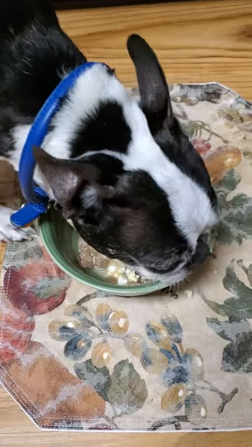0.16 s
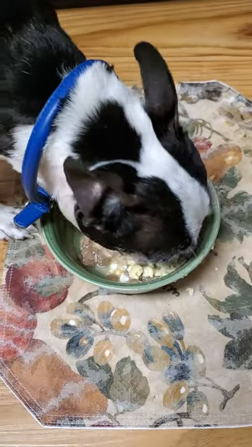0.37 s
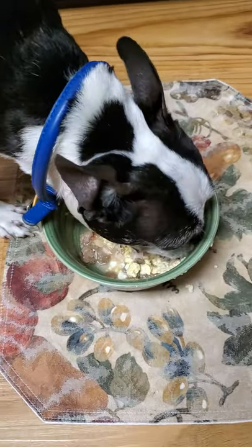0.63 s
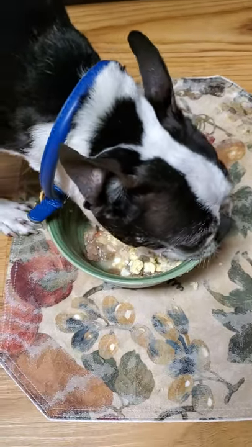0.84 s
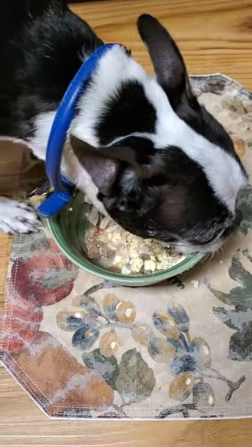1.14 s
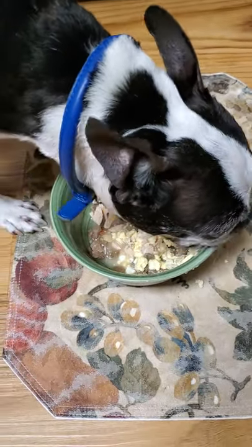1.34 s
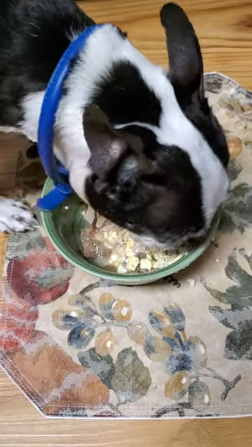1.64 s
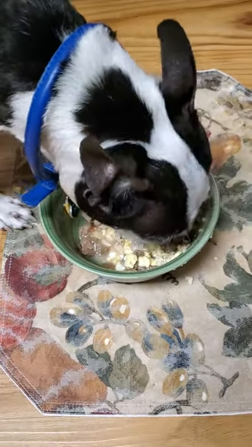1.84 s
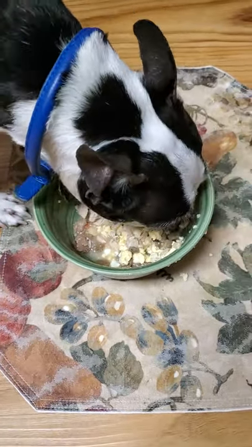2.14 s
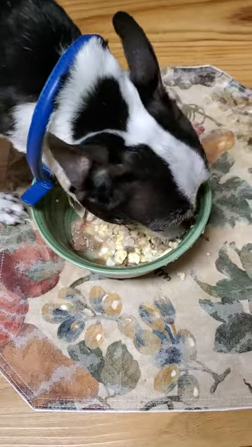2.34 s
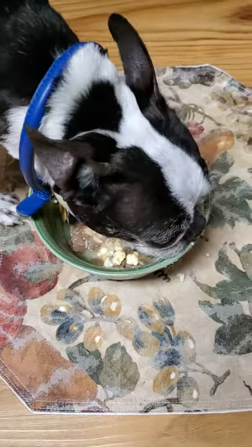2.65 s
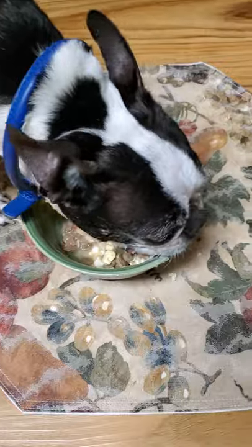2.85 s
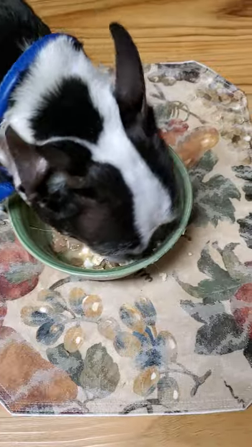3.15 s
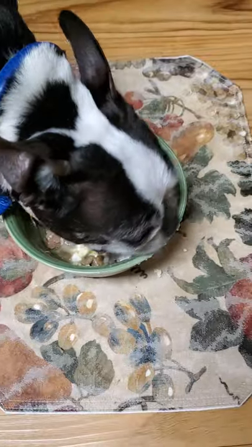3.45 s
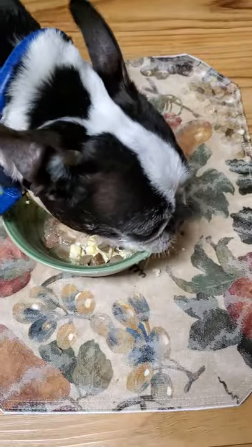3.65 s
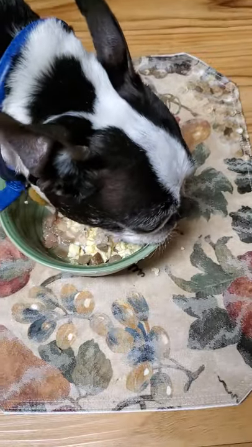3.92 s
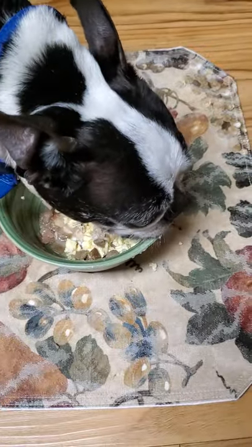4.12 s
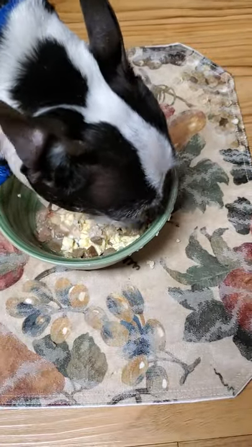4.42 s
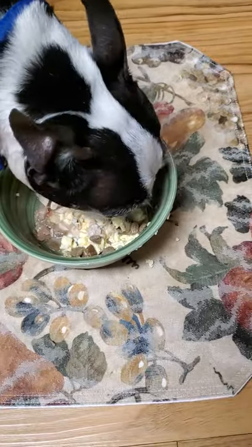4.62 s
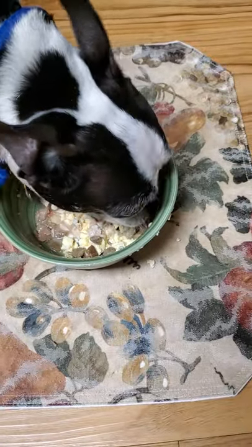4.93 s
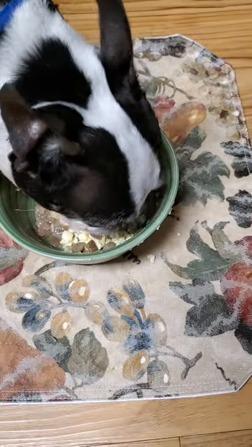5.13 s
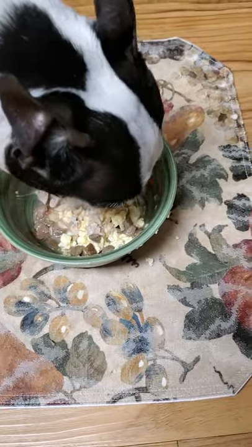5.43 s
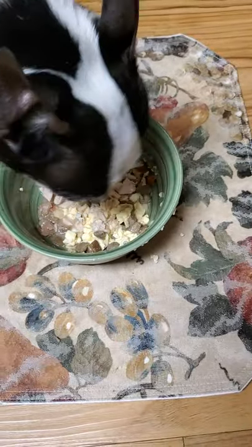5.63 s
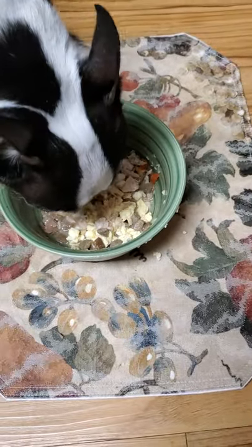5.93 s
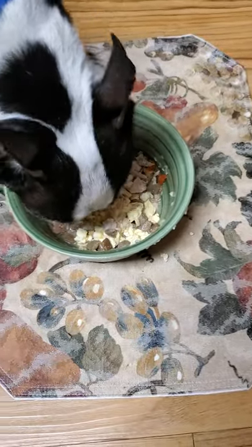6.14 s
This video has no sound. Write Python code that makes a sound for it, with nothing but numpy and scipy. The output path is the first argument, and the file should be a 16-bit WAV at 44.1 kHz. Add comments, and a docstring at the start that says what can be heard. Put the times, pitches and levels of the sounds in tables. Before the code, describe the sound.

Close stereo microphones in a small room catch a short-nosed dog eating soft food, over steady quiet low hum and soft room noise. At 0 s comes a short snort and a crisp wet smack, with faint sniffs until 0.5 s. Tiny sticky ticks continue throughout; delicate metallic tag clicks fall at 0.5-0.7 s. Chewing grows from 1 to 1.9 s, with clear smacks at 1.2 and 1.5 s. A bright, hard tag-on-ceramic clink rings at 1.77 s, followed by lighter ones near 2-2.4 s among rattling snorts until 2.8 s. Another clink sounds at 3.2 s, short snorts at 3.5 and 4.07 s, and juicy smacks at 4.1-4.3 s. A strong clink rings at 4.5 s, then small ones follow. From 5.3 s snorts crowd together; a hissing slurp starts at 5.67 s, a clink rings at 5.88 s, and deep rattling snuffles with hollow low smacks finish the scene at about 6.1 s.

```python
"""A short-nosed dog eats soft food from a ceramic bowl on a wooden floor, close to two microphones.
Lips and tongue smack as saliva films burst and ring the mouth; a slurp crackles between wet lips.
It snorts into the food: air flutters the soft palate, rings the muzzle and hisses through the nostrils.
The metal tag on its collar clinks against the bowl, both ringing in their natural modes.
Behind it lie the reflections of a small living space, soft room noise and the hum of an appliance."""
import sys
import numpy as np
from scipy import signal
from scipy.fft import rfft, irfft, next_fast_len
from scipy.io import wavfile
from scipy.ndimage import uniform_filter1d

SR = 44100
rng = np.random.default_rng(int(sys.argv[2]) if len(sys.argv) > 2 else 0)


def unload_audio(sound):
    """Save the sound as a 16-bit wav file, at the path given as the first command line argument."""
    columns = np.transpose(np.atleast_2d(sound))
    # keep every value between -1 and 1, then stretch to whole-number steps
    steps = np.round(np.clip(columns, -1, 1) * 32767)
    wavfile.write(sys.argv[1], SR, steps.astype(np.int16))


N = 276940
TIME = np.arange(N) / SR

# loud smacks of lips, tongue and throat:
# (time [s], level before mouth colour [dB], mouth resonance [Hz], length [s], wet spray [dB])
SMACKS = [(0.066, -42, 10760, .025, -3.5), (0.081, -23.5, 2320, .006, -38), (0.091, -33, 1630, .039, -20),
          (0.201, -41, 1980, .021, -16.5), (.43, -43.5, 2450, .004, -5), (0.549, -44.5, 2350, 0.0047, -17),
          (0.603, -47, 1990, 0.011, -18), (1.049, -43.5, 2340, .021, -12),
          (1.197, -30.5, 2440, .005, -15.5), (1.242, -41.5, 2420, .021, 5), (1.375, -34, 2290, 0.012, -11),
          (1.519, -26.5, 2900, 0.012, -7.5), (1.528, -24, 2810, .004, -10),
          (2.201, -32.5, 1680, 0.0099, -17), (2.281, -35.5, 2530, 0.011, -36),
          (2.324, -27.5, 2640, 0.0038, -42), (2.336, -35, 2430, .012, -20),
          (2.652, -39.5, 2330, 0.0091, -15.5), (2.818, -43, 2060, 0.0073, -23),
          (2.962, -49.5, 2480, .005, -20), (3.648, -44.5, 2570, 0.021, -43),
          (3.809, -43, 1890, 0.0091, -10), (3.862, -46.5, 1430, 0.019, -45),
          (3.935, -46, 2380, 0.036, -19.5), (4.109, -29, 2770, 0.0073, -12.5),
          (4.168, -30.5, 1990, 0.00476, -29), (4.175, -39, 1240, 0.023, -38),
          (4.243, -41.5, 2670, .006, -12), (4.269, -40.5, 2460, 0.0043, -14),
          (4.442, -45.5, 2500, 0.0077, 9), (4.589, -34, 1505, .016, -12), (4.884, -37, 3040, .009, -21),
          (5.538, -37, 2020, 0.013, -5.5), (5.671, -31.5, 710, 0.0043, -29),
          (5.669, -36.5, 3320, .004, -58), (6.046, -26.5, 670, 0.0021, -12.5),
          (6.083, -31.5, 610, 0.0028, -10.5), (6.137, -30.5, 680, 0.0023, -32)]
# bouts of chewing, head raised: (start [s], end [s])
CHEWING = [(.12, 0.67), (.98, 1.96), (2.6, 3.4), (3.66, 4.32)]
# spray of a bursting saliva film: (frequency [Hz], relative density [dB per Hz])
SALIVA_SPRAY = [(600, -5.5), (1500, -7), (3000, 4.5), (5000, 4), (7000, 3.5), (10000, -14), (15000, -23.5)]
# formants of the half-closed mouth: (frequency [Hz], gain [dB])
MOUTH_COLOUR = [(300, 3), (800, 4), (1350, -5), (1850, 4.5), (2300, -2.5), (2650, 4.5), (3300, -6),
                (4500, 2.5), (6500, -6), (12000, 8.5)]
# snorts: (middle [s], length [s], relative flutter level [dB], nasal level [dB], hiss level [dB], rattle [0-1])
SNORTS = [(.01, 0.15, -41, -43, -53, 0.54), (.11, 0.058, -47.5, -55, -50, .24),
          (.219, 0.044, -48, -47, -71, 0.32), (0.473, .064, -46.5, -60, -48.5, 0.2),
          (2.025, 0.088, -46.5, -38.5, -38, 0.79), (2.223, 0.067, -40.5, -36.5, -46, 1),
          (2.425, 0.069, -39, -45, -44.5, 0.73), (2.673, 0.035, -42, -42.5, -51.5, 0.7),
          (2.827, 0.029, -37.5, -40, -45, 0.45), (3.474, 0.089, -36.5, -39, -49, .11),
          (3.505, .06, -39.5, -41.5, -74, 0.18), (3.799, 0.049, -52, -56.5, -56, .3),
          (4.072, 0.072, -37, -35, -44.5, .2), (4.184, 0.051, -51.5, -45, -70, .5),
          (5.293, 0.099, -36, -37.5, -49, 0.29), (5.402, 0.081, -45, -28, -46, 0.14),
          (5.473, 0.15, -46, -65, -41, 0.14), (5.69, 0.044, -39, -39, -76, 0.77),
          (5.737, .11, -30.5, -32.5, -46, 0.61), (5.821, 0.091, -37, -48.5, -47.5, 0.66),
          (5.935, 0.11, -43, -55.5, -41, 0.56), (6.001, 0.059, -35, -34.5, -40.5, 0.8),
          (6.064, 0.094, -33, -40.5, -54.5, 0.93), (6.142, .11, -36.5, -35.5, -41, 0.85)]
# palate flutter at mid-snort, slacker once the muzzle digs deep: (time [s], pitch [Hz])
PALATE_PITCH = [(0, 150), (2.2, 156), (5.4, 158.4), (6.05, 123.6)]
# muzzle resonances before they glide: (frequency [Hz], width [Hz], relative level [dB])
MUZZLE = [(402, 54, 1), (570, 120, 3.5), (672, 140, 4), (829, 155, 1), (1180, 310, -22), (1870, 250, -13)]
# hiss of the nostrils before each snort's brightness: (frequency [Hz], relative density [dB per Hz])
NOSTRIL_HISS = [(1200, 6.5), (2200, 5.5), (3200, 2.5), (5000, -1), (7000, -4.5), (9000, 2.5), (12000, -5.5),
                (15500, 2)]
# tag against bowl: (time [s], bowl blow [dB], tag swing [dB], tick level [dB],
# tag's brightest frequency [Hz], damping of the bowl's middle modes [dB])
CLINKS = [(.463, -61, -51, -41, 11900, 6), (.491, -47.5, -51, -33, 10060, 9.5),
          (.657, -71, -54.5, -48, 10600, 19), (.706, -58, -48.5, -51, 11000, 13),
          (.721, -47.5, -45.5, -35, 13000, 17), (1.151, -62.5, -64, -45, 11500, 2),
          (1.234, -69, -53, -46, 10900, 2), (1.29, -72, -27, -37, 10400, 9),
          (1.38, -67, -57, -34, 11100, 5), (1.452, -65, -50.5, -42, 10200, 20),
          (1.766, -22.5, -32, -18.5, 11500, -0.5), (1.976, -34, -27.5, -25, 10400, 13),
          (2.065, -33.5, -32.5, -29, 11700, 9.5), (2.145, -49.5, -39.5, -31, 11700, 6),
          (2.192, -45.5, -41, -34, 11900, 9), (2.298, -51.5, -48, -36, 11700, 2),
          (2.374, -51.5, -41, -38, 11800, 8), (2.824, -57, -43.5, -41, 11500, 14),
          (3.214, -29.5, -32.5, -26.5, 12600, 22), (3.3, -45, -45, -29, 10800, 11),
          (3.651, -58, -51.5, -55, 11400, 17), (4.517, -22.5, -39, -19.5, 9600, 5.5),
          (4.848, -42, -40.5, -35, 10700, 11), (4.932, -56, -49.5, -40, 11700, 3),
          (4.964, -60, -50.5, -42, 12100, 9), (5.151, -48.5, -43.5, -35, 10900, 13.5),
          (5.251, -46, -41.5, -33.5, 12000, 15), (5.323, -46.5, -35.5, -31.5, 13440, 16),
          (5.878, -28, -46, -24, 11700, 0.5), (6.236, -49.5, -53.5, -36, 11200, 14)]
# natural frequencies of the bowl: (frequency [Hz])
BOWL_HZ = [991, 2390, 4246, 4268, 6540, 9150, 10120, 12048, 12510, 13885, 15165]
# natural frequencies of the tag: (frequency [Hz])
TAG_HZ = [8380, 10205, 10245, 11620, 11690, 14970]
# bowl modes, in the order of BOWL_HZ: (relative level [dB], t60 [s], left minus right [dB])
BOWL_MODES = [(-19.5, 0.67, -8), (-1, 0.44, -11.5), (-3.5, 0.35, -5), (7, 0.064, -2), (-7.5, 0.25, -4),
              (-10.5, 0.19, 10.5), (-19, 0.43, -0.5), (-15.5, 0.33, 6), (-32.5, 0.21, -11.5),
              (-34, 0.2, 12.5), (-9.5, 0.15, 11)]
# tag modes, in the order of TAG_HZ: (relative level [dB], t60 [s], left minus right [dB])
TAG_MODES = [(1.5, 0.27, 4), (0, 0.13, 15), (-17, 0.57, 7), (-3.5, 0.25, -4), (6, 0.16, 5), (-1, 0.22, 2.5)]
# tilt of mouth and nose between the microphones, shared out in beside():
# (frequency [Hz], leaning to the left [dB])
HEAD_BALANCE = [(150, 1.3), (400, -2.5), (1300, -1.5), (2400, -11.5), (4400, -4.5), (8000, 5), (15000, -2)]
# decay of the room: (frequency [Hz], t60 [s])
ROOM_T60 = [(100, 0.088), (600, 0.49), (2000, 0.21), (6000, .32), (15000, 0.18)]
# room noise: (frequency [Hz], relative density [dB per Hz])
ROOM_NOISE = [(25, -72), (40, -5.5), (55, -5.5), (125, -5.5), (250, -8.5), (500, -17.5), (1000, -28.5),
              (2200, -35.5), (4000, -42), (7000, -46), (11000, -42), (16000, -44)]
# hum of motor and mains: (frequency [Hz], mean level [dB])
HUM = [(59.3, -50.5), (79.8, -48), (118.8, -59), (194, -62.5), (238, -66)]

# small wet ticks: mean rate, mean levels, middle pitch, length scale
CHEW_TICKS_PER_S, CHEW_DB, CHEW_HZ, CHEW_TICK_LENGTH_S = 24, -51, 2110, .008
ROOTING_DB = -54   # the ticks are softer while the muzzle is down in the food
PALATE_SAG_OCTAVES_PER_S, MUZZLE_SAG_OCTAVES_PER_S = 4.76, 2.3   # both pitches sink during a snort
FLUTTER_LEAD_S = 0.0117   # in a smooth snort the palate flaps before the air breaks through the nose
MUZZLE_PITCH_RATIO, RATTLE_RAISES_OCTAVES = .91, .27   # a tight, rattling nose resonates higher
HISS_NEUTRAL_DB, HISS_THINNING = -48.5, 0.088   # weaker hiss is thinner (dB per octave for each dB)
SLURP_S, SLURP_LENGTH_S, SLURP_DB = 5.67, 0.42, -53.5   # food is sucked in
SLURP_START_HZ, SLURP_END_HZ, SLURP_GLIDE_S = 3030, 5030, 0.072
SLURP_END_WIDTH_HZ = 800
# a square blow rings the bowl's high modes more than a glancing one
HARDNESS_DB_PER_OCTAVE, SQUARE_BLOW_BRIGHTENS = 0.27, 0.15
DAMPED_HZ, DAMPED_OCTAVES = 3670, 0.49   # centre and reach of the modes that the point of contact weakens
LEFT_LEAD_S = 0.0001925   # sound reaches the left microphone first
SIDE_PHASE_SCATTER = .45   # side-to-side phase varies from blow to blow (radians)
CUTOFF_HZ = 16000


def from_db(db):
    """Decibels to gain."""
    return 10 ** (np.asarray(db) / 20)


def rms_one(x):
    """Scale to rms 1."""
    return x / np.sqrt(np.mean(x ** 2) + 1e-20)


def at_hz(points, hz):
    """Read a table on a log-frequency axis."""
    table = np.array(points)
    return np.interp(np.log(np.maximum(hz, 1)), np.log(table[:, 0]), table[:, 1])


def colour(x, spectrum, share=1):
    """Shape a sound by a smooth spectrum in dB, multiplied by `share`."""
    length = x.shape[-1]
    size = next_fast_len(length + 2048)
    gain = from_db(share * at_hz(spectrum, np.fft.rfftfreq(size, 1 / SR)))
    return irfft(rfft(x, size) * gain, size)[..., :length]


def resonate(x, hz, width_hz):
    """Two-pole resonance with gain 1 on top."""
    r = np.exp(-np.pi * width_hz / SR)
    zeros = np.array([1, 0, -1]) * (1 - r * r) / 2
    poles = [1, -2 * r * np.cos(2 * np.pi * hz / SR), r * r]
    return signal.lfilter(zeros, poles, x + 1e-18)


def drift(rate, t):
    """Random curve about 0, through a new normal draw `rate` times a second."""
    return np.interp(t * rate, np.arange(1024), rng.standard_normal(1024))


def add(track, s, sound):
    """Mix a sound in from time s."""
    start = max(round(s * SR), 0)
    part = track[..., start:start + sound.shape[-1]]
    part += sound[..., :part.shape[-1]]


def smack(hz, length, spray_db=-10, pops_per_s=520, ring_s=0.00039, spray_s=0.00043,
          cheek_db=-12, spread=0.15):
    """Saliva films burst in quick succession: each sprays briefly and rings the mouth at a pitch of its own."""
    out, t = np.zeros(SR // 8), np.arange(512) / SR
    draws = rng.standard_normal((48, 4))
    spray = rms_one(colour(rng.standard_normal(4096), SALIVA_SPRAY))
    pops = int(np.clip(2 + length * pops_per_s, 2, len(draws)))
    for k, (late, size, pitch, damping) in enumerate(draws[:pops]):
        turn = 2 * np.pi * hz * np.exp(spread * pitch) * t
        age = t / (ring_s * np.exp(.35 * damping))
        tones = np.sin(turn) + from_db(cheek_db) * np.sin(0.596 * turn)
        cavity = tones * age * np.exp(1 - age)
        own_spray = np.roll(spray, k * len(t))[:len(t)]
        snap = from_db(spray_db) * own_spray * 2 * np.exp(-t / spray_s)
        add(out, length * (k + .4 * abs(late)) / pops, from_db(3.7 * size) * (cavity + snap))
    # the loudest 4 ms get rms 1
    return out / np.sqrt(uniform_filter1d(out ** 2, size=176).max())


def mouth(spread_db=3, pitch_spread=0.42, spray_db=-19):
    """Loud smacks, and small wet ticks at uneven intervals all along, louder in the bouts of chewing."""
    out = np.zeros(N)
    for s, level_db, hz, length, spray in SMACKS:
        add(out, s, from_db(level_db) * smack(hz, length, spray))
    for k, (late, size, pitch, length) in enumerate(rng.standard_normal(size=(320, 4))):
        s = (k + late) / CHEW_TICKS_PER_S
        chewing = any(start < s < end for start, end in CHEWING)
        level_db = CHEW_DB if chewing else ROOTING_DB
        hz = CHEW_HZ * np.exp(pitch_spread * np.tanh(pitch))
        tick = smack(hz, CHEW_TICK_LENGTH_S * abs(length), spray_db)
        add(out, s, from_db(level_db + spread_db * min(size, 1.5)) * tick)
    return out


def slurp(crackle_db=5):
    """Air crackles between wet lips; their resonance rises as the gap narrows."""
    out, t = np.zeros(N), np.arange(SR) / SR
    hz = SLURP_END_HZ + (SLURP_START_HZ - SLURP_END_HZ) * np.exp(-t / SLURP_GLIDE_S)
    air = rng.standard_normal(len(t)) * from_db(crackle_db * drift(301, t))
    lips = resonate(air, SLURP_END_HZ, SLURP_END_WIDTH_HZ)
    # playing the noise at a changing speed glides the resonance
    gliding = rms_one(np.interp(np.cumsum(hz / SLURP_END_HZ) / SR, t, lips))
    add(out, SLURP_S, from_db(SLURP_DB) * gliding * np.exp(-(t / SLURP_LENGTH_S) ** 2))
    return out


def snorts(flutter_db=3.0, jitter=0.176, gating=0.15, slap_db=5, slaps_per_s=55, crackle_db=4.0, spit=4):
    """Air flaps the soft palate; turbulence and uneven slaps ring the muzzle, wet nostrils hiss and spit."""
    out, t = np.zeros(N), np.arange(SR // 3) / SR
    muzzle_lowpass = signal.butter(2, 2800, fs=SR, output="sos")
    for middle, length, flap_db, nasal_db, hiss_db, rattle in SNORTS:
        start = max(middle - length, 0)
        past_middle = start + t - middle
        flow = np.exp(-6 * (past_middle / length) ** 2)

        palate_hz = np.interp(middle, *np.transpose(PALATE_PITCH))
        hz = palate_hz * 2 ** (-PALATE_SAG_OCTAVES_PER_S * past_middle)
        unsteady_hz = hz * np.exp(jitter * (.5 + rattle) * drift(141.7, t))
        phase = 2 * np.pi * np.cumsum(unsteady_hz) / SR
        flap = np.sin(phase) + 0.096 * np.sin(2 * phase)
        flap *= from_db(7.5 * rattle * drift(109.0, t))

        # the flapping palate gates the air
        air = rng.standard_normal((2, len(t))) * (1 + gating * np.sin(phase))
        slap_rate = slaps_per_s * np.exp(.5 * drift(60, t))
        slaps = np.diff(np.floor(np.cumsum(slap_rate) / SR), prepend=0)

        drive = air[0] + from_db(slap_db) * rattle * rms_one(slaps)
        nasal = sum((-1) ** k * from_db(db) * resonate(drive, f, width)
                    for k, (f, width, db) in enumerate(MUZZLE))
        # the muzzle's resonances glide together
        octaves = RATTLE_RAISES_OCTAVES * rattle - MUZZLE_SAG_OCTAVES_PER_S * past_middle
        pitch_ratio = MUZZLE_PITCH_RATIO * 2 ** octaves
        gliding = np.interp(np.cumsum(pitch_ratio) / SR, t, nasal)
        nasal = signal.sosfilt(muzzle_lowpass, gliding)

        # each slap lets a short spurt of air through
        spurts = 1 + spit * rattle * signal.lfilter([1], [1, -np.exp(-1 / (0.0034 * SR))], slaps)
        brightness = HISS_THINNING * (HISS_NEUTRAL_DB - hiss_db)
        hiss_spectrum = [(f, db + brightness * np.log2(f)) for f, db in NOSTRIL_HISS]
        hiss = colour(air[1] * spurts * from_db(crackle_db * drift(700, t)), hiss_spectrum)

        flap_lead = FLUTTER_LEAD_S * (1 - rattle)
        parts = [(flap, flutter_db + flap_db, flap_lead), (nasal, nasal_db, 0), (hiss, hiss_db, 0)]
        for part, level_db, lead in parts:
            rms = np.sqrt(np.average(part ** 2, weights=flow ** 2))
            add(out, start - lead, flow * from_db(level_db) * part / rms)
    return out


def struck(natural_hz, modes, gains_db, t, scatter_db=3.05, flutter_db=6.5, flutter_per_s=160,
           flutter_full_hz=6000):
    """Modes ring out, fluttering more towards the treble while the tag grazes the bowl, phased per side."""
    level_db, t60, pan_db = np.transpose(modes)[:, :, None]
    luck = rng.standard_normal((3, len(modes), 1))
    depth_db = flutter_db * np.minimum(natural_hz / flutter_full_hz, 1)
    flutter = depth_db * np.array([drift(flutter_per_s, t) for mode in modes]) * np.exp(-t / 0.25)
    grazing_db = 4 * np.exp(-t / 0.069) - 2   # contact drains the first part of the ring quickly
    struck_db = level_db + gains_db + scatter_db * luck[0]
    envelope = from_db(struck_db + flutter + grazing_db - 60 * t / t60)
    phase = 2 * np.pi * natural_hz * t + np.pi * luck[1]
    lead = np.pi * natural_hz * LEFT_LEAD_S + SIDE_PHASE_SCATTER * luck[2]
    return np.array([np.sum(envelope * from_db(side * pan_db / 2) * np.sin(phase + side * lead), axis=0)
                     for side in (1, -1)])


def clinks(bowl_db=1, focus_db=26, tick_s=0.0046, tick_low_db=-11, jingle_db=-10, jingle_s=0.017,
           buzz_db=-20, buzz_s=0.078, buzz_width_hz=420, touch_loss_db=5):
    """The tag hits the bowl: a tick, both ring, the contact buzzes in high modes, the split ring jingles."""
    out, t = np.zeros((2, N)), np.arange(int(SR * .4)) / SR
    bowl_hz, tag_hz = np.array(BOWL_HZ)[:, None], np.array(TAG_HZ)[:, None]
    middle_modes = np.exp(-(np.log2(bowl_hz / DAMPED_HZ) / DAMPED_OCTAVES) ** 2)
    for s, blow_db, swing_db, tick_db, bright_hz, damping_db in CLINKS:
        hardness = HARDNESS_DB_PER_OCTAVE + SQUARE_BLOW_BRIGHTENS * (blow_db - swing_db)
        tilt_db = hardness * np.minimum(np.log2(bowl_hz / 6000), .7)
        bowl_gains_db = bowl_db + blow_db + tilt_db - damping_db * middle_modes
        bowl = struck(bowl_hz, BOWL_MODES, bowl_gains_db, t)
        tag_gains_db = swing_db - focus_db * abs(np.log2(tag_hz / bright_hz))
        tag = struck(tag_hz, TAG_MODES, tag_gains_db, t)

        noise = rng.standard_normal((2, len(t)))
        swapped = noise[::-1]   # left and right exchanged
        tick_high = rms_one(resonate(noise, 12400, 3600))
        tick_low = from_db(tick_low_db) * rms_one(resonate(swapped, 3800, 2470))
        tick = (tick_high + tick_low) * from_db(tick_db) * np.exp(-t / tick_s)
        buzz = rms_one(sum(resonate(noise, hz, buzz_width_hz) for hz in BOWL_HZ[3:] + TAG_HZ[::2]))
        buzz *= from_db(buzz_db + blow_db) * np.exp(-t / buzz_s)
        jingle = rms_one(resonate(swapped, bright_hz, 750))
        jingle *= from_db(jingle_db + swing_db) * np.exp(-t / jingle_s)

        # a firm touch damps what still rings
        firm = tick_db > -44
        out *= from_db(-touch_loss_db * np.clip((TIME - s) / 0.0045, 0, 1) * firm)
        onset = 1 - np.exp(-t / 0.00071)
        add(out, s, (bowl + tag + tick + buzz + jingle) * onset)
    return out


def beside(x):
    """The right microphone hears the head slightly later, and each side with its own colour."""
    late = np.interp(TIME - LEFT_LEAD_S, TIME, x)
    return np.array([colour(x, HEAD_BALANCE, share=0.89), colour(late, HEAD_BALANCE, share=-0.41)])


def room(x, low_hz=300):
    """Diffuse reflections, different on each side, dying at their own rate in six bands."""
    t, tail = np.arange(SR // 2) / SR, 0
    edges = np.geomspace(low_hz, CUTOFF_HZ, 7)
    for low, high in zip(edges, edges[1:]):
        bandpass = signal.butter(2, [low, high], "band", fs=SR, output="sos")
        band = signal.sosfilt(bandpass, rng.standard_normal((2, len(t))))
        tail = tail + band * from_db(-60 * t / at_hz(ROOM_T60, np.sqrt(low * high)))
    tail = tail * (t > .003)   # the first reflections need 3 ms
    return signal.fftconvolve(x, tail / np.sqrt(np.sum(tail ** 2) / 2), axes=1)[:, :N]


def background(noise_db=-52, waver_db=1, bass_side_db=-17, treble_side_db=-2):
    """Wavering motor and mains hum over soft room noise that is nearly alike on both sides in the bass."""
    hum = np.zeros(N)
    for hz, db in HUM:
        level = np.sqrt(2) * from_db(db + waver_db * drift(1.9, TIME))
        phase = 2 * np.pi * (hz * TIME + rng.random()) + 0.083 * drift(1.6, TIME)
        hum += level * np.sin(phase)
    mid, side = rms_one(colour(rng.standard_normal((2, N)), ROOM_NOISE))
    side = colour(side, [(120, bass_side_db), (900, treble_side_db)])
    return hum + from_db(noise_db) * (mid + side * [[1], [-1]])


def scene(mouth_room_db=-6, snort_room_db=-9, clink_room_db=-11):
    """Dog and bowl close by, in a small living space."""
    smacking = beside(colour(mouth(), MOUTH_COLOUR))
    nose = beside(snorts() + slurp())
    bowl = clinks()
    into_room = from_db(mouth_room_db) * smacking + from_db(snort_room_db) * nose
    into_room += from_db(clink_room_db) * bowl
    return smacking + nose + bowl + room(into_room) + background()


def record(dry):
    """The microphones drop the deep bass; the top of the treble is cut steeply."""
    thinned = signal.sosfilt(signal.butter(6, 48, "high", fs=SR, output="sos"), dry)
    return signal.sosfilt(signal.ellip(10, .2, 70, CUTOFF_HZ, fs=SR, output="sos"), thinned)


dry = scene()
out = record(dry)
unload_audio(out)
```